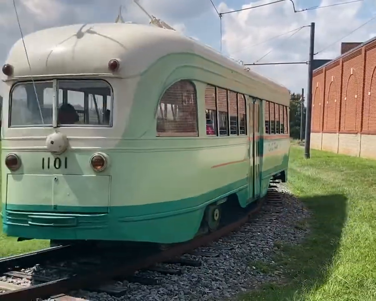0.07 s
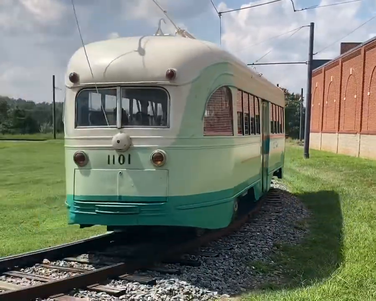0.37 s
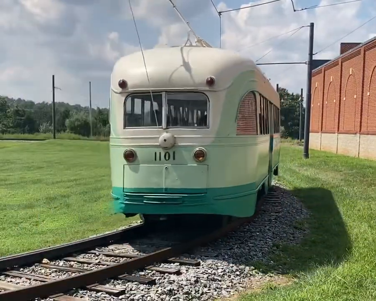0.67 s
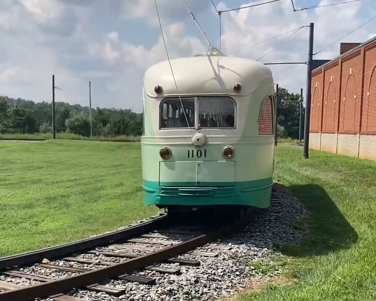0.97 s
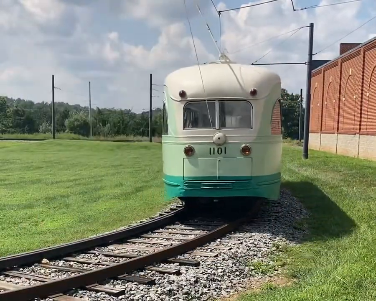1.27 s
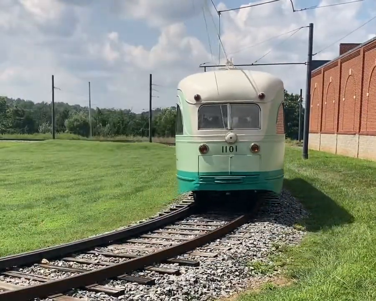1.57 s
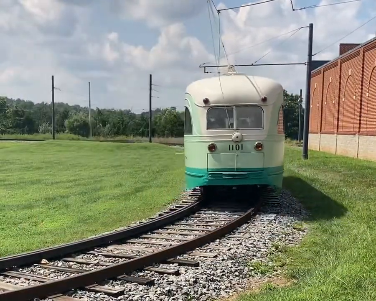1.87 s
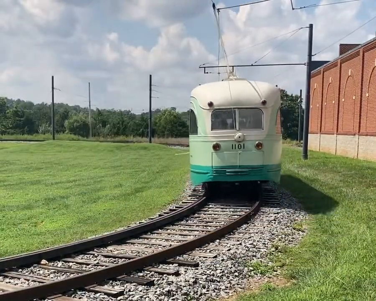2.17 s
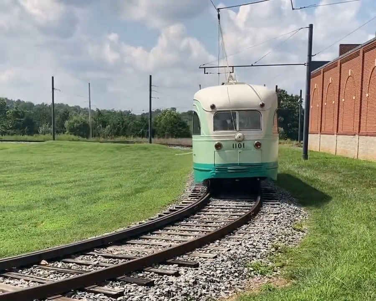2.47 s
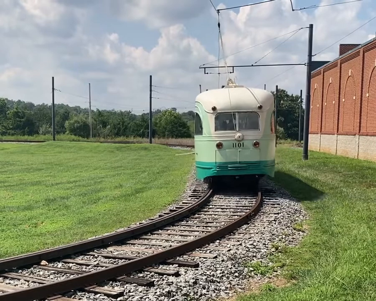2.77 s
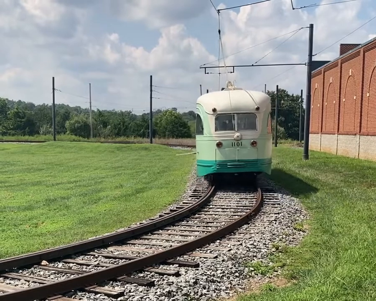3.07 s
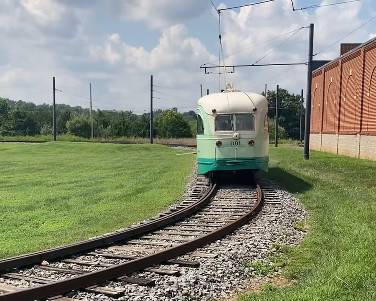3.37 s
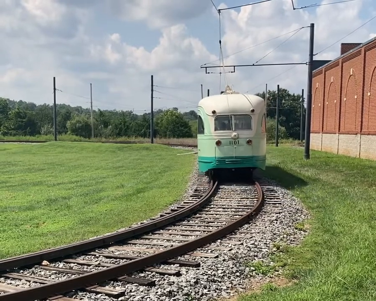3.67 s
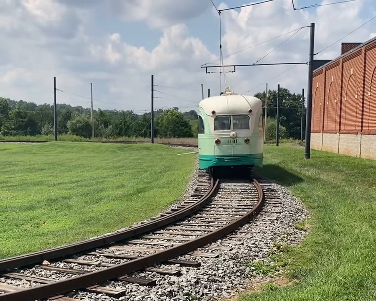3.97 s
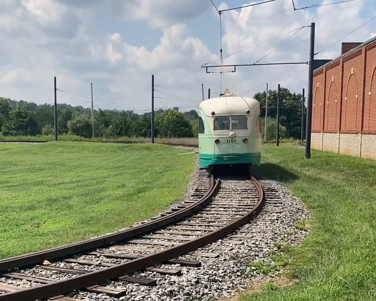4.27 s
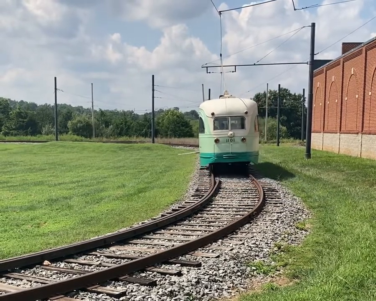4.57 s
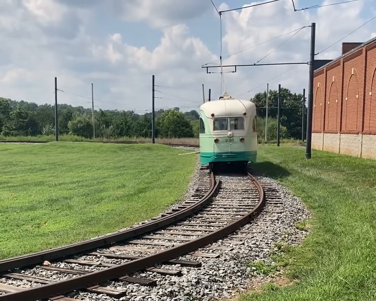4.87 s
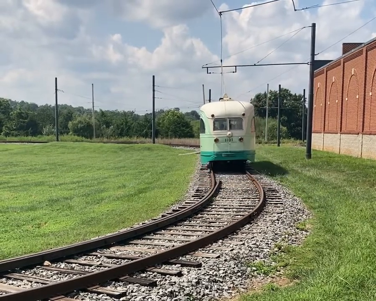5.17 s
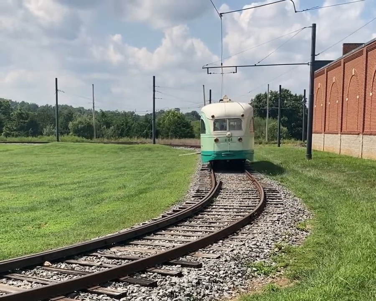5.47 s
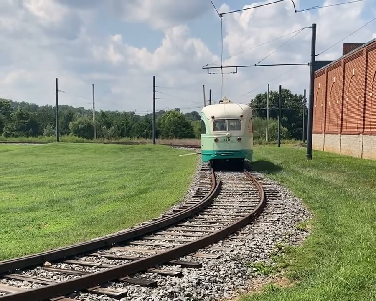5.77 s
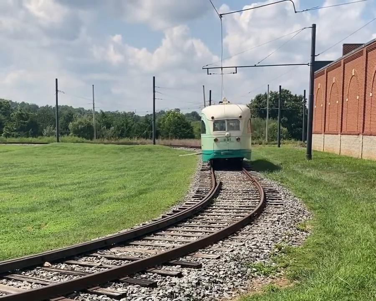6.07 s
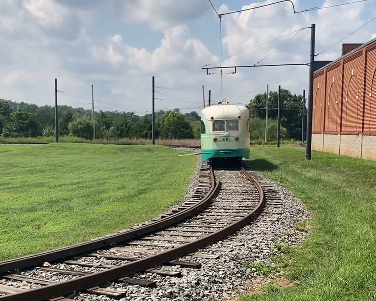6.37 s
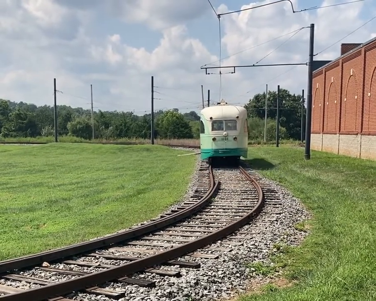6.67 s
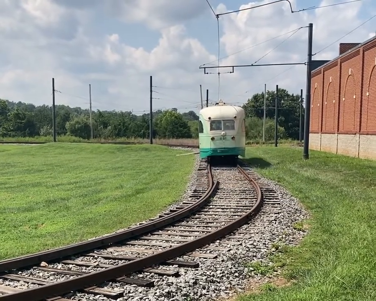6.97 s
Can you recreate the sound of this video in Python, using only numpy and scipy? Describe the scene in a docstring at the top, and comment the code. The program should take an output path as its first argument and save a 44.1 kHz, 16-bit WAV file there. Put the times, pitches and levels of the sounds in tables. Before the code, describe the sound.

A streetcar rolls by close to the microphone with a low rumble, hollow booms and a steady motor hum. Its wheels clank over rail joints and grind round the curve with short ringing groans, and a spark snaps on the overhead wire. The car then recedes, its knocks growing softer and further apart. Faint insects and a few thin, high bird whistles come through in the open field.

```python
"""A summer field, where an old streetcar rolls away round a curve of ballasted track.
Rough rails shake its body, flanges grind and ring the wheels, joints knock, loose parts tick,
and a motor hums on as it recedes. The trolley sizzles and snaps on its wire;
insects and a few thin bird whistles lie behind."""
import sys
import numpy as np
from scipy import signal
from scipy.fft import rfft, irfft, next_fast_len
from scipy.io import wavfile
from scipy.ndimage import uniform_filter1d

SR = 44100
rng = np.random.default_rng(int(sys.argv[2]) if len(sys.argv) > 2 else 0)


def master_out(mix):
    """Clip the mix to full scale and print it as 16-bit PCM to the path in sys.argv[1]."""
    frames = np.transpose(np.atleast_2d(mix))
    ceiling = np.clip(frames, -1, 1)
    pcm = np.round(ceiling * 32767).astype(np.int16)
    wavfile.write(sys.argv[1], SR, pcm)


N = 313551
T = np.arange(N) / SR
SIZE = next_fast_len(N + SR // 2)
FREQS = np.maximum(np.fft.rfftfreq(SIZE, 1 / SR), 1)

START_M, SPEED_M_S = 4.24, 2.435
NEARNESS = START_M / (START_M + SPEED_M_S * T)  # gain of the car as it recedes at an even pace
BLUR = np.interp(T, [1.1, 3.02], [0, 1])  # crossfade from close detail to distant wash


def undb(db):
    """Decibels to gain."""
    return 10 ** (np.asarray(db) / 20)


def across(points):
    """(Hz, value) points joined on a log-frequency axis."""
    hz, value = np.transpose(points)
    return np.interp(np.log(FREQS), np.log(hz), value)


def respond(x, response):
    """Filter by a frequency response that keeps the power of white noise."""
    rms = np.sqrt(np.mean(abs(response) ** 2))
    return irfft(rfft(x, SIZE) * response / rms, SIZE)[..., :N]


def colour(x, eq):
    """Minimum-phase EQ through (Hz, dB) points."""
    cepstrum = irfft(np.log(undb(across(eq))), SIZE)
    cepstrum[1:SIZE // 2] *= 2
    cepstrum[SIZE // 2 + 1:] = 0
    return respond(x, np.exp(rfft(cepstrum)))


def ring(x, modes):
    """Drive a set of damped modes of alternating sign."""
    response = sum((-1) ** k * undb(db) / (1 + 1j * (FREQS ** 2 - hz ** 2) / (FREQS * width))
                   for k, (hz, width, db) in enumerate(modes))
    return respond(x, response)


def walk(rate):
    """Smooth random wander with a spread of 1, at `rate` steps a second."""
    hold = max(int(SR / rate), 1)
    steps = np.repeat(rng.standard_normal(N // hold + 1), hold)
    smooth = uniform_filter1d(uniform_filter1d(steps, hold), hold)[:N]
    return smooth / smooth.std()


def noise():
    """Unrelated white noise for left and right."""
    return rng.standard_normal((2, N))


def chatter(rate, spread_db):
    """Noise that comes in uneven little bursts, rms 1."""
    force = noise() * undb(spread_db * walk(rate))
    return force / force.std()


def swells(rows, attack, release):
    """Envelope of (s, length, dB) events that rise, hold and let go; their powers add."""
    power = np.zeros(N)
    for s, length, db in rows:
        shape = np.clip((T - s) / attack, 0, 1) * np.exp(-np.maximum(T - s - length, 0) / release)
        power += (shape * undb(db)) ** 2
    return np.sqrt(power)


def blows(times, rises, levels_db, t60):
    """Envelope of blows that build up and die away; their powers add."""
    power = np.zeros(N)
    for s, rise, db in zip(times, rises, levels_db):
        span = slice(int(s * SR), int((s + 1) * SR))
        age = T[span] - s
        shape = np.clip(age / rise, 0, 1) * undb(-60 * np.maximum(age - rise, 0) / t60)
        power[span] += (shape * undb(db)) ** 2
    return np.sqrt(power)


def strike(times, rises, levels_db, t60, rattle, spike_db):
    """Force of a set of blows: a spike each, weaker the slower it rises, and a dying rattle."""
    force = rattle * blows(times, rises, levels_db, t60)
    force[:, ((times + rises / 2) * SR).astype(int)] += undb(levels_db + spike_db) * rises.min() / rises
    return force


def tone(hz, db, waver, flutter_db, rate):
    """A sine that wavers a little in pitch and level."""
    phase = 2 * np.pi * np.cumsum(hz * (1 + waver * walk(rate))) / SR
    return np.sin(phase) * undb(db + flutter_db * walk(rate))


def held_tones(rows, attack, release, waver, flutter_db):
    """One rough, swelling tone for each (s, length, Hz, dB) cue."""
    return sum(swells([(s, length, db)], attack, release) * tone(hz, 0, waver, flutter_db, rate=130)
               for s, length, hz, db in rows)


def sway(x, drift_s=0.000873):
    """The shifting load bends the pitch of a resonance slightly up and down."""
    warped = T + drift_s * walk(9)
    return np.array([np.interp(warped, T, channel) for channel in x])


# flange bites on the rail: t/s, length/s, wheel ring level/dB, rail ring level/dB, rim rasp level/dB
GRINDS = [(0.592, 0.22, -34.5, -56, -71), (1.657, 0.071, -28, -35, -59), (1.742, 0.078, -30.5, -38, -62),
          (1.812, 0.06, -26.5, -36.5, -57), (1.9, 0.1, -28, -36.5, -50.5), (2.018, 0.098, -26.5, -41, -56)]
def grinding(part):
    """Envelope of the flange bites that reach one part."""
    column = ("wheel", "rail", "rim").index(part)
    return swells([(s, length, db[column]) for s, length, *db in GRINDS], attack=0.027, release=0.056)


# ringing modes of wheel and rail: f/Hz, width/Hz, level/dB
WHEEL_MODES = [(483, 12, -6), (600, 90, -13), (729, 18, 0), (782, 26, -3), (857, 24, -3), (915, 45, -10),
               (983, 18, -8)]
RAIL_MODES = [(1080, 70, -3), (1180, 36, -1), (1252, 26, 1), (1321, 20, 0), (1447, 34, -3), (1560, 50, -7),
              (1690, 50, -5), (1820, 32, -3), (1950, 70, -11), (2086, 36, -7), (2165, 40, -11),
              (2461, 40, -11), (2950, 50, -14)]
# EQ of the rail's roar: f/Hz, level/dB
ROAR_EQ = [(300, -13.5), (550, -2), (850, 4), (1300, -1), (2000, -7.5), (3000, -11), (6000, -43.5)]
def rolling_steel(straight_s=3.8, straight_db=-21):
    """Flanges stick and slip, ringing wheel and rail; distance blurs the ring into a soft roar."""
    free_db = straight_db * (T > straight_s)  # on straight track the flanges run free
    wheel = np.hypot(NEARNESS * undb(-35.5 + free_db), grinding("wheel"))
    # the rail carries sound back, so it fades more slowly than the car
    rail = np.hypot(NEARNESS ** 0.68 * undb(-46), grinding("rail"))
    friction = chatter(300, 0.59) * undb(2 - 9 * BLUR)
    ringing = sway(ring(friction * wheel, WHEEL_MODES) + ring(friction * rail, RAIL_MODES))
    roar = colour(chatter(60, 0.6) * rail * np.sqrt(0.054 + BLUR) * undb(3), ROAR_EQ)
    return ringing + roar


# lurches in the curve that swell the rumble: t/s, length/s, level/dB
LURCHES = [(.2, 0.4, -27.5), (.62, 0.45, -34), (1.86, 0.31, -40)]
# EQ of the rumble, close and distant: f/Hz, level/dB
CLOSE_EQ = [(25, -41.5), (40, 0.5), (60, -1.5), (82, 4.5), (110, 0), (200, -1), (310, -2), (420, -7.5),
            (620, -11.5), (1200, -20.5), (3000, -53)]
DISTANT_EQ = [(25, -36.5), (42, -4), (60, 4), (85, 0), (118, 2.5), (145, -8.5), (178, -2), (250, -9.5),
              (350, -15), (450, -20), (800, -44), (3000, -73.5)]
# body panel modes: f/Hz, width/Hz, level/dB
PANEL_MODES = [(102, 10, -2), (122, 12, -2), (168, 10, 1), (220, 20, -5), (264, 22, -2), (305, 26, -5),
               (358, 22, 0)]
def body_rumble():
    """Rough rails shake the body and flange bites ring its panels; the rumble dulls with distance."""
    body = np.hypot(NEARNESS * undb(-27.5), swells(LURCHES, attack=0.19, release=0.14))
    shake = body * np.sqrt(1 - BLUR)
    close = colour(chatter(60, 2.8) * shake * undb(0.5), CLOSE_EQ)
    panel_drive = np.hypot(shake * undb(-1), grinding("wheel") * undb(-6))
    panels = sway(ring(noise() * panel_drive, PANEL_MODES))
    distant = colour(chatter(18, 1.0) * body * np.sqrt(BLUR) * undb(2), DISTANT_EQ)
    return close + panels + distant


# sideways scrapes: t/s, length/s, level/dB
SCRAPES = [(-.05, .16, -39), (.37, 0.1, -40.5), (.83, 0.22, -48), (1.03, 0.074, -42.5), (1.23, 0.083, -43),
           (1.5, 0.091, -39.5), (1.68, 0.044, -43), (1.88, 0.12, -48)]
# EQ of gritty hiss: f/Hz, level/dB
HISS_EQ = [(1200, 1), (2600, 6.5), (3800, 3), (4600, 1.5), (5400, -5), (6200, -2.5), (7200, -8.5),
           (8700, -5.5), (10500, -11), (13000, -46), (15500, -33)]
def wheel_slide(bed_db=-45):
    """Wheels slide sideways on the rail: a bed of hiss with scrapes on top."""
    level = np.hypot(NEARNESS * undb(bed_db), swells(SCRAPES, attack=0.027, release=0.045))
    return colour(chatter(240, 0.85) * level, HISS_EQ)


# pitch and level automation of the hum: t/s, f/Hz, level/dB
HUM = [(0, 61, -32.5), (1.85, 60, -35), (2.15, 60, -34.5), (2.6, 63.2, -32.5), (3.25, 62.5, -30),
       (3.65, 62.7, -35.5), (5, 65.7, -34), (7.11, 65.6, -34.5)]
def motor(near_flutter_db=2.5, far_flutter_db=1.5):
    """A low hum that shudders in the curve and settles as the car draws away."""
    s, hz, db = np.transpose(HUM)
    flutter_db = far_flutter_db + (near_flutter_db - far_flutter_db) * NEARNESS
    return tone(np.interp(T, s, hz), np.interp(T, s, db), waver=0.0062, flutter_db=flutter_db, rate=16)


# sizzles on rough stretches of wire: t/s, length/s, level/dB
SIZZLES = [(-.05, 0.051, -39), (.7, 0.15, -47.5), (.84, 0.051, -42.5), (1.05, 0.071, -41.5)]
# spark snaps: t/s, rise/s, level/dB
SNAPS = [(1.528, 0.0023, -48), (1.671, 0.0022, -30), (4.18, 0.015, -51), (4.225, 0.022, -45),
         (4.335, 0.0057, -43), (4.831, 0.011, -41.5), (5.788, 0.0097, -48), (5.885, 0.0093, -49),
         (5.944, 0.0082, -43.5)]
# EQ of the sparks: f/Hz, level/dB
SPARK_EQ = [(1500, 6.5), (4000, -1.5), (6000, -4.5), (7500, 2), (9500, 4), (11500, -7), (15500, -9)]
def trolley(bed_db=-57.5, fade_from_s=3.3, fade_db_per_s=4.5, spark_db=22):
    """The trolley sizzles away along its wire; the quicker a snap, the sharper its first spark."""
    bed = undb(bed_db - fade_db_per_s * np.maximum(T - fade_from_s, 0))
    sizzle = np.hypot(bed, swells(SIZZLES, attack=0.014, release=0.11))
    s, rise, db = np.transpose(SNAPS)
    snaps = chatter(600, 1.0) * blows(s, rise, db, t60=0.24)
    snaps[:, ((s + rise) * SR).astype(int)] += undb(db + spark_db) * np.sqrt(rise.min() / rise)
    return colour(snaps + chatter(900, 2.9) * sizzle, SPARK_EQ)


# EQ of the insect bed: f/Hz, level/dB
INSECT_EQ = [(3000, -4), (5500, -6), (6800, 0), (7600, 6), (8400, 5), (9300, -21), (10200, -33),
             (11000, -52), (13000, -41)]
def insects(db=-63):
    """A steady high chorus in the grass."""
    return colour(chatter(60, 0.85), INSECT_EQ) * undb(db + 0.28 * walk(6.7))


# hollow booms, and one swell of the motor hum: t/s, length/s, f/Hz, level/dB
BOOMS = [(.21, 0.29, 102, -24), (.64, 0.31, 115.6, -32), (.88, 0.086, 164.3, -25.5),
         (2.09, 0.15, 59.7, -28), (.47, 0.043, 353, -22.5), (.67, 0.028, 371, -24.5),
         (.8, 0.04, 364.5, -26.5), (1.58, 0.06, 355, -34.5), (1.86, 0.088, 360, -32),
         (2.11, 0.072, 349, -33.5)]
def body_booms():
    """The car body booms in short, hollow low tones that sometimes overlap; one low tone swells the motor's
    hum."""
    return held_tones(BOOMS, attack=0.026, release=0.018, waver=0.0071, flutter_db=2.0)


def steel_ring(on_wheel, on_rail, contact_hz=(400, 1850)):
    """Wheel and rail ring; the springy contact of steel on steel passes only the mids."""
    contact = signal.butter(3, contact_hz, "band", fs=SR, output="sos")
    ringing = ring(on_wheel, WHEEL_MODES) + ring(on_rail, RAIL_MODES)
    return signal.sosfilt(contact, ringing + colour(on_rail, ROAR_EQ) * undb(-6))


# layered track hits: t/s, thud level/dB, crunch level/dB, clink level/dB
THUMPS = [(0.4, -32, -50, -37.5), (0.672, -30, -42.5, -62), (0.871, -26, -43, -44), (1.338, -25, -41, -42),
          (1.685, -30, -41, -42), (2.242, -28, -47, -45.5), (2.704, -28.5, -46.5, -50),
          (3.172, -33, -46, -57), (3.63, -35, -47, -45), (4.338, -30, -43, -47), (4.83, -32, -42, -41),
          (5.942, -44, -54, -46)]
# EQ of the thud: f/Hz, level/dB
THUD_EQ = [(30, -28), (70, -3.5), (160, -1.5), (230, 7), (360, -7.5), (480, -6.5), (700, -26),
           (2000, -18.5), (5000, -88)]
# modes of loose fittings: f/Hz, width/Hz, level/dB
FITTING_MODES = [(1560, 90, -3), (1720, 80, 0), (2110, 70, 0), (2330, 80, -6), (3380, 70, -9),
                 (3800, 130, -9), (4110, 90, -9), (4490, 130, -6)]
def track_thumps(rise_s=0.013, thud_lag_s=0.008):
    """The track gives: ballast crunches, steel rattles, fittings clink, and a dull body thud follows."""
    s, thud_db, crunch_db, clink_db = np.transpose(THUMPS)
    rise = np.full(len(s), rise_s)
    jolt = strike(s + thud_lag_s, 2 * rise, thud_db, t60=0.23, rattle=chatter(130, 0.72), spike_db=15)
    grit = chatter(240, 3.2) * blows(s, rise, crunch_db, t60=0.25)
    jiggle = strike(s, rise, clink_db, t60=0.27, rattle=chatter(300, 4.6), spike_db=15)
    steel = steel_ring(grit * undb(-2), grit * undb(-4))
    return colour(jolt, THUD_EQ) + colour(grit, HISS_EQ) + steel + ring(jiggle, FITTING_MODES)


# rail joint hits: t/s, rise/s, wheel ring level/dB, rail ring level/dB
CLANKS = [(.403, 0.0033, -32, -38), (.466, 0.0045, -31, -37), (.508, .006, -36, -38),
          (.67, 0.012, -28, -36), (.799, 0.0039, -24.5, -40), (1.237, 0.0031, -28, -34.5),
          (1.3235, 0.0033, -21.5, -21.5), (1.588, 0.0039, -26.5, -42), (1.657, 0.0047, -25, -38),
          (2.229, 0.0036, -21, -31), (2.663, 0.016, -28, -37.5), (3.12, 0.012, -38.5, -47),
          (3.61, .014, -31.5, -46.5), (4.296, 0.0031, -45, -48.5), (4.785, 0.0046, -37.5, -49),
          (5.947, 0.00395, -53, -47.5)]
def joint_clanks(t60=0.18, spike_db=23.5, rebound_s=0.016, rebound_db=-6, tail_db=-12.5):
    """A wheel drops over a joint and rebounds once, ringing itself and the rail, which jars on."""
    s, rise, wheel_db, rail_db = np.transpose(CLANKS)
    first, second = (chatter(500, 1.8) * undb(-3) for _ in range(2))
    on_wheel, on_rail = (strike(s, rise, db, t60, first, spike_db)
                         + strike(s + rebound_s, rise, db + rebound_db, t60, second, spike_db)
                         for db in (wheel_db, rail_db))
    jarring = chatter(150, 3.0) * blows(s + rebound_s, rise, rail_db + tail_db, t60=0.58)
    return steel_ring(on_wheel, on_rail + jarring)


# hard, dry knocks: t/s, frame level/dB, axle level/dB
KNOCKS = [(.408, 6, -2), (.456, 3, -16), (.47, -9, 2), (.483, -4, 5), (1.252, -4, -14), (2.722, -8, -24),
          (3.638, -15, -17), (4.344, -14, -24), (4.842, -14, -17), (5.95, -34, -28)]
# modes of truck frame and axle: f/Hz, width/Hz, level/dB
FRAME_MODES = [(270, 90, 0), (410, 110, -2)]
AXLE_MODES = [(790, 110, 0), (1020, 170, -7)]
def truck_knocks():
    """Single blows on the heavily damped frame and axle."""
    s, frame_db, axle_db = np.transpose(KNOCKS)
    force = np.zeros((2, N))
    force[:, (s * SR).astype(int)] = undb([frame_db, axle_db])
    return ring(force[0], FRAME_MODES) + ring(force[1], AXLE_MODES)


# faint, thin squeaks, and the high ring of a spark's snap: t/s, length/s, f/Hz, level/dB
SQUEAKS = [(.41, 0.069, 10450, -57), (.62, 0.11, 10400, -61), (1.25, 0.055, 10440, -57),
           (1.273, 0.021, 1850, -41), (1.668, 0.011, 7300, -41), (2.66, 0.049, 3400, -55)]
def steel_squeaks():
    """Steel sticks and slips on steel, locking briefly onto a high resonance; one spark's snap rings on high."""
    return held_tones(SQUEAKS, attack=0.0081, release=0.013, waver=0.014, flutter_db=3.5)


# bright modes of the wheel rim: f/Hz, width/Hz, level/dB
RIM_MODES = [(2950, 90, -7), (3400, 80, -1), (3710, 90, 0), (4080, 110, -3), (4490, 90, -4)]
def rim_rasp():
    """Each flange bite scratches a bright edge out of the rim."""
    return sway(ring(chatter(200, 3.0) * grinding("rim"), RIM_MODES))


# groans in the curve: t/s, length/s, f/Hz, level/dB
GROANS = [(.66, 0.081, 767, -25.5), (.79, 0.02, 855, -27), (1.49, .06, 727, -38), (1.59, 0.16, 487, -35),
          (1.68, 0.046, 738, -17.5), (1.82, 0.02, 865, -28), (1.955, 0.04, 731, -27.5)]
def flange_groans():
    """A flange sticks and slips, singing one wheel mode."""
    return held_tones(GROANS, attack=0.014, release=0.021, waver=0.0188, flutter_db=1.5)


# bird whistles: t/s, length/s, start f/Hz, end f/Hz, pre-fader level/dB
WHISTLES = [(2.358, 0.14, 8940, 8700, -58.5), (3.002, 0.19, 7730, 7800, -58.5),
            (5.753, .1, 9050, 8460, -57), (5.787, 0.063, 7640, 7150, -59), (5.853, .04, 7250, 7700, -56),
            (5.919, 0.034, 8000, 8700, -48), (5.956, 0.097, 8500, 8480, -56), (6.001, .09, 7600, 8300, -58),
            (6.15, 0.14, 8900, 8770, -57), (6.31, 0.12, 8650, 8300, -65), (6.335, .06, 7540, 6850, -62),
            (6.452, 0.077, 8870, 8900, -67), (6.456, 0.075, 7250, 7070, -65), (6.76, .34, 7440, 7450, -75),
            (6.84, .1, 8700, 8900, -72), (6.952, 0.13, 9100, 8600, -63)]
def birds(arch_hz=69.5, waver=0.0117, flutter_db=4.0):
    """Very high, thin whistles from the trees; each glides along a shallow arch."""
    song = np.zeros(N)
    wobble = 1 + waver * walk(250)
    flutter = undb(flutter_db * walk(89))
    for s, length, start_hz, end_hz, db in WHISTLES:
        span = (T > s) & (T < s + length)
        progress = (T[span] - s) / length
        arch = np.sin(np.pi * progress)
        hz = (start_hz + (end_hz - start_hz) * progress + arch_hz * arch) * wobble[span]
        song[span] += undb(db) * np.sqrt(arch) * np.sin(2 * np.pi * np.cumsum(hz) / SR)
    return song * flutter


def foliage(x, t60=0.25):
    """Leaves scatter a sound into a short diffuse tail."""
    tail = noise()[:, :SR // 3] * undb(-60 * T[:SR // 3] / t60)
    tail /= np.sqrt(np.sum(tail[0] ** 2))
    return signal.fftconvolve(x[None], tail, axes=1)[:, :N]


# metal ticks under the car: t/s, rise/s, f/Hz, level/dB
TICKS = [(3.177, .007, 3720, -47), (4.035, .02, 4100, -59), (4.228, .018, 4490, -49),
         (5.775, .025, 4450, -56), (5.885, .006, 4600, -59)]
def loose_ticks(t60=0.3, width_hz=260, undertone_ratio=0.8, undertone_db=-5):
    """Small loose parts rattle briefly, each on its own pair of modes."""
    rattle = chatter(400, 3.0)
    ticks = np.zeros((2, N))
    for s, rise, hz, db in TICKS:
        modes = [(hz, width_hz, 0), (hz * undertone_ratio, width_hz, undertone_db)]
        ticks += ring(rattle * blows([s], [rise], [db], t60), modes)
    return ticks


def scene():
    """The mix: the car's tones, rolling bed, hits and electrics, with the field behind."""
    tones = flange_groans() + body_booms() + steel_squeaks()
    song = birds()
    rolling = body_rumble() + rolling_steel() + wheel_slide() + rim_rasp()
    hits = joint_clanks() + truck_knocks() + track_thumps() + loose_ticks()
    electrics = trolley() + motor()
    field = undb(-5) * song + undb(-2.5) * foliage(song) + insects()
    return tones + rolling + hits + electrics + field


# stereo width between two microphone ports: f/Hz, side against mid level/dB
WIDTH = [(60, -28), (130, -26), (300, -16), (450, -8), (600, -3.5), (750, -9), (1300, -7), (2100, -3),
         (2800, -7), (4500, -6.5), (5600, -11), (8300, -14), (10300, -11), (15000, -11)]
# balance: f/Hz, left minus right level/dB
BALANCE = [(60, 0.56), (200, -0.2), (420, 2), (650, -3), (900, 0), (2200, -1.5), (3500, 0)]
# phase between the ports: f/Hz, left lead/rad
PHASE_LEAD = [(200, 0), (520, -.3), (700, .9), (1050, -.5), (1550, .7), (2100, .6), (2500, -3),
              (3000, -3.2), (4100, -5.1), (5500, -3.1), (7900, -.2), (9200, .3), (11700, 3.1), (14500, 6.2)]
def record(dry, top_hz=15500):
    """Two close ports share the bass; the casing turns their phase apart higher up; the top is cut."""
    left, right = rfft(dry, SIZE)
    width = undb(across(WIDTH))
    sign = np.array([[1], [-1]])
    ports = (left + right + sign * width * (left - right)) / np.sqrt(2 + 2 * width ** 2)
    ports *= undb(sign * across(BALANCE) / 2) * np.exp(0.5j * sign * across(PHASE_LEAD))
    high_cut = signal.ellip(10, 0.2, 80, top_hz, fs=SR, output="sos")
    return signal.sosfilt(high_cut, irfft(ports, SIZE)[:, :N])


dry = scene()
out = record(dry)
master_out(out)
```